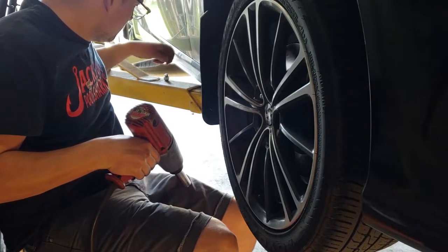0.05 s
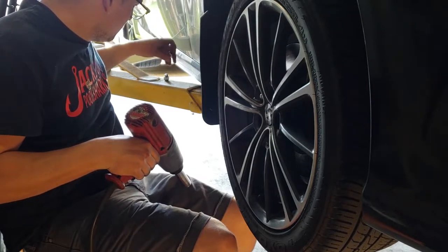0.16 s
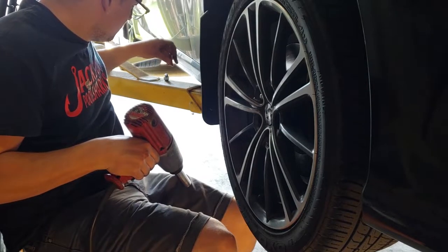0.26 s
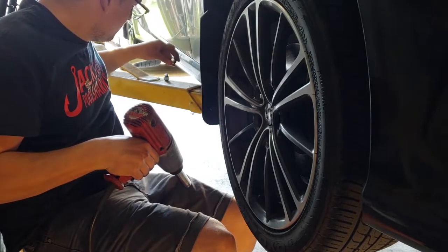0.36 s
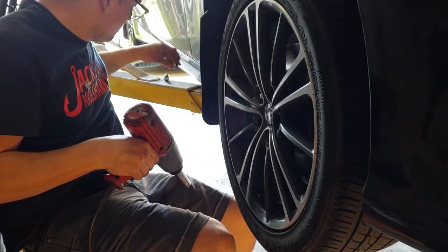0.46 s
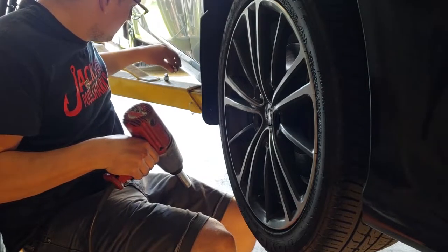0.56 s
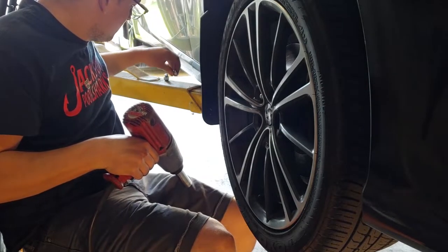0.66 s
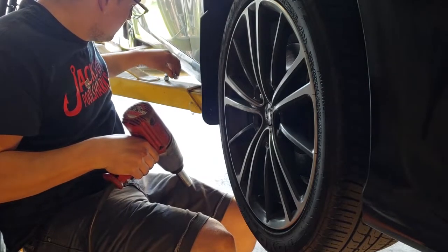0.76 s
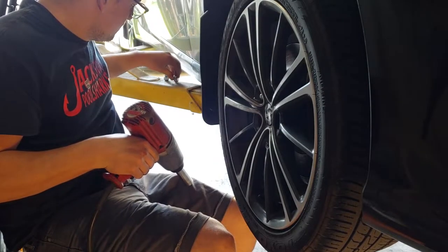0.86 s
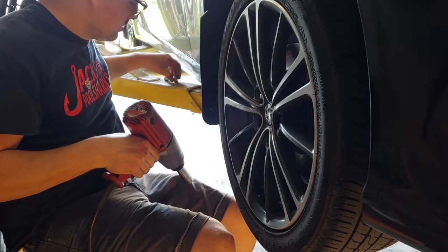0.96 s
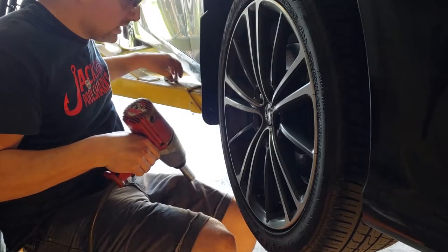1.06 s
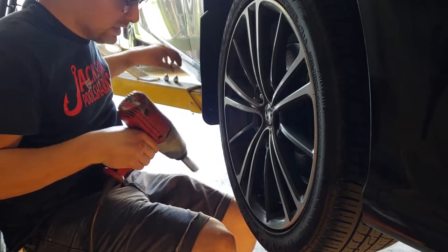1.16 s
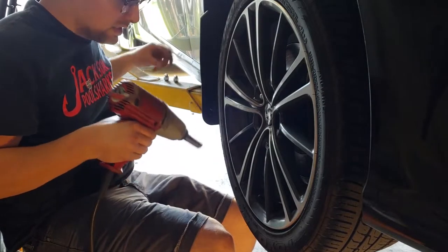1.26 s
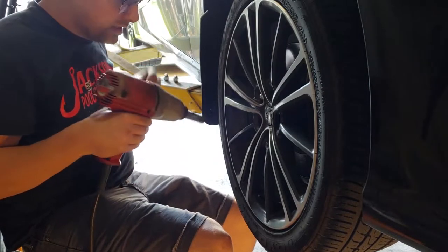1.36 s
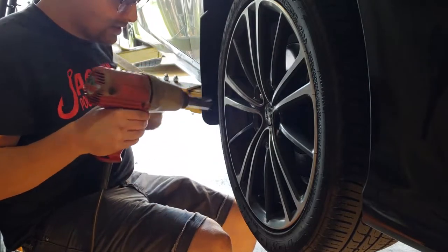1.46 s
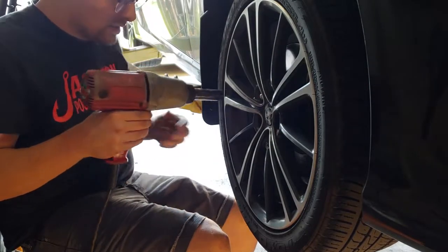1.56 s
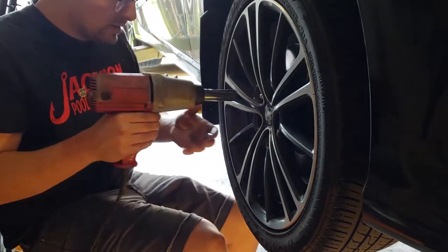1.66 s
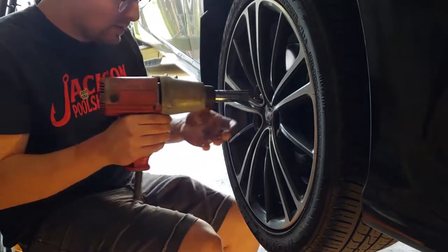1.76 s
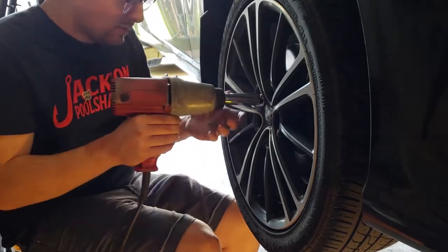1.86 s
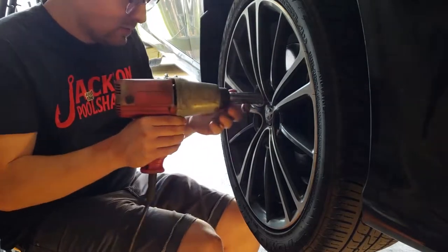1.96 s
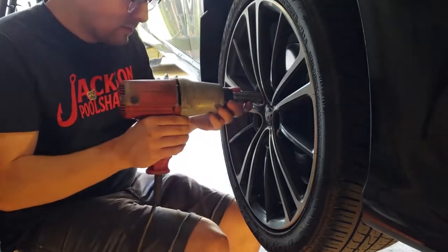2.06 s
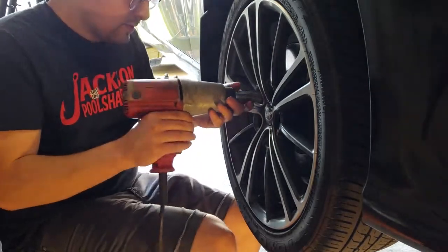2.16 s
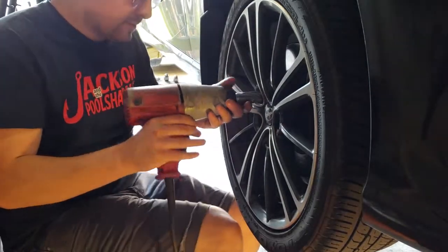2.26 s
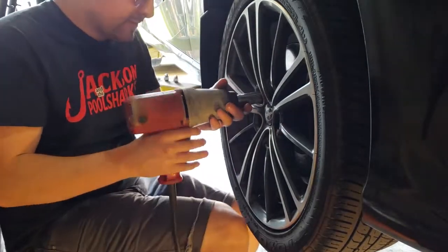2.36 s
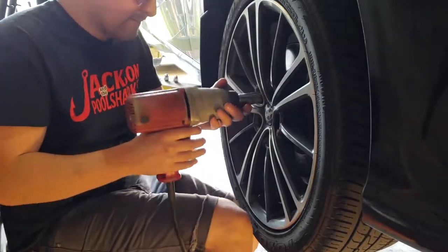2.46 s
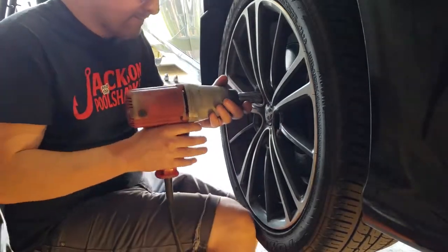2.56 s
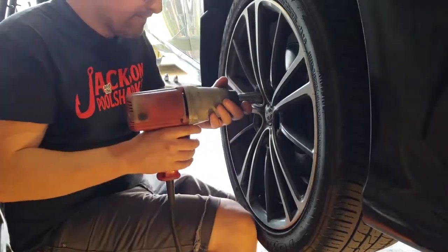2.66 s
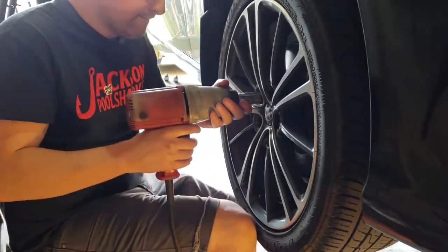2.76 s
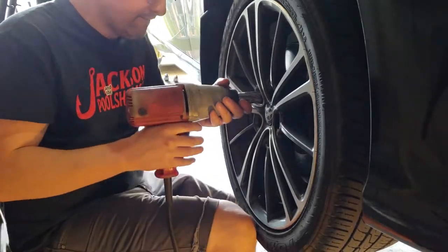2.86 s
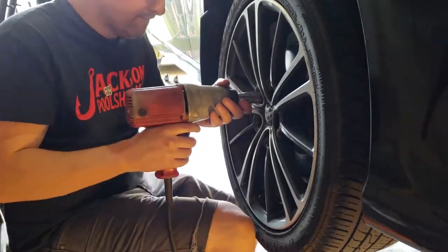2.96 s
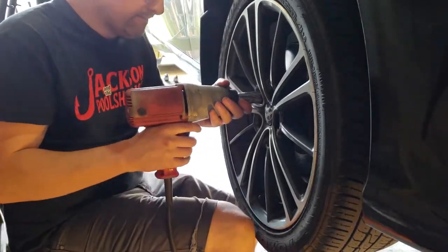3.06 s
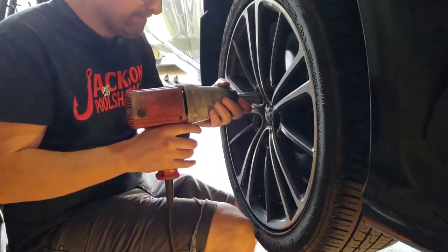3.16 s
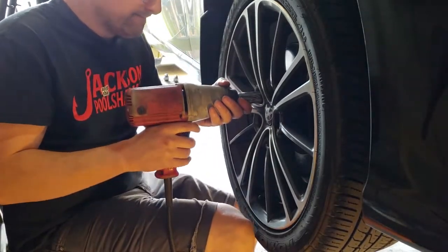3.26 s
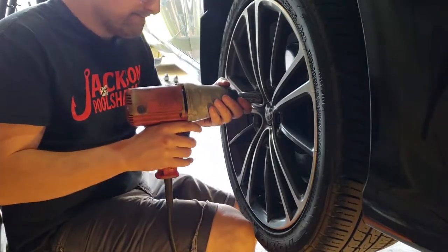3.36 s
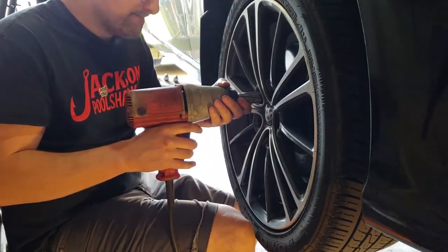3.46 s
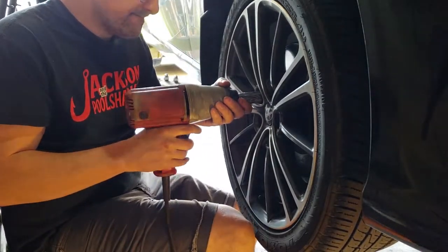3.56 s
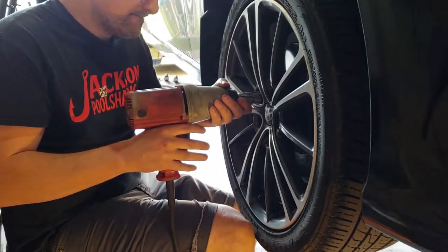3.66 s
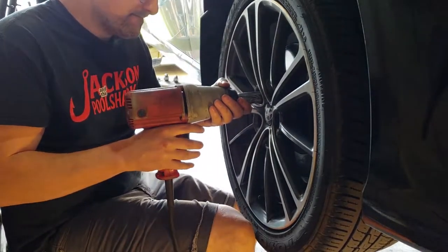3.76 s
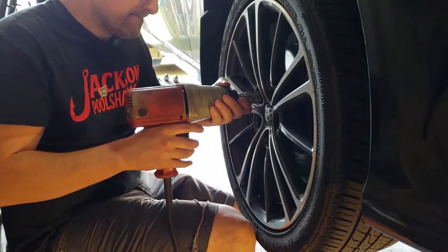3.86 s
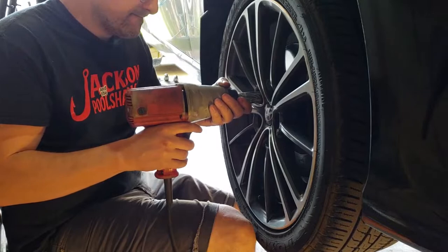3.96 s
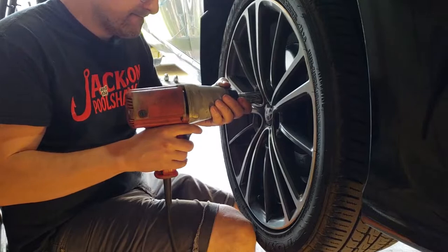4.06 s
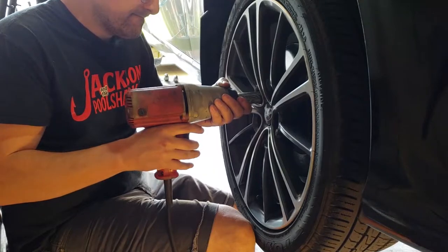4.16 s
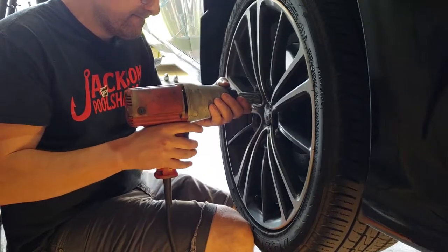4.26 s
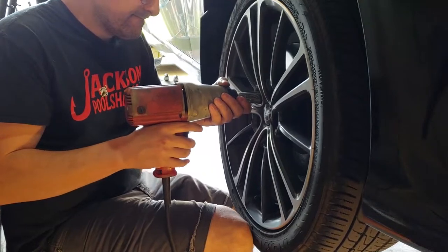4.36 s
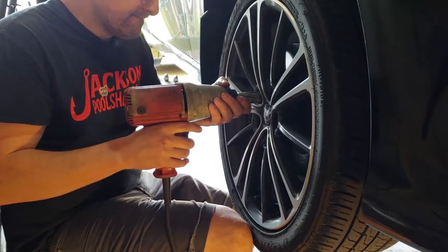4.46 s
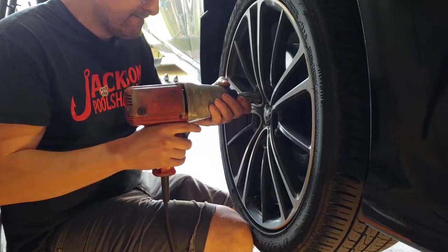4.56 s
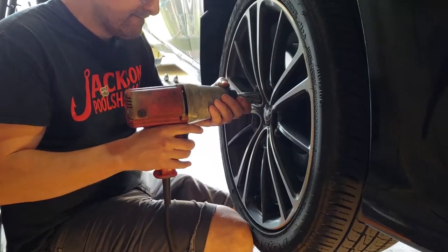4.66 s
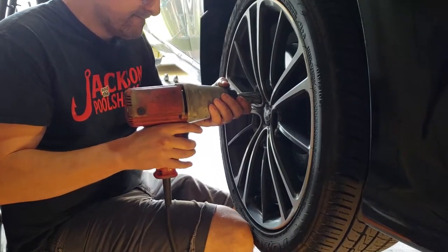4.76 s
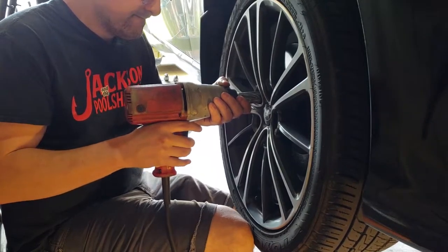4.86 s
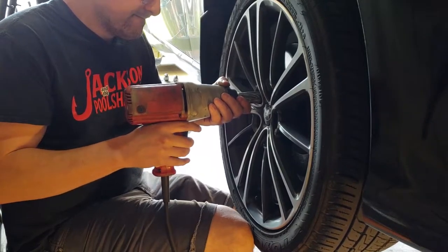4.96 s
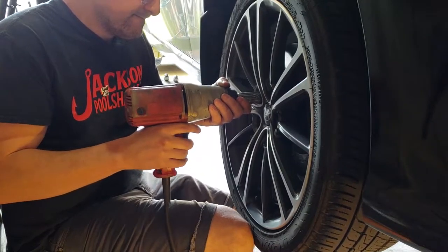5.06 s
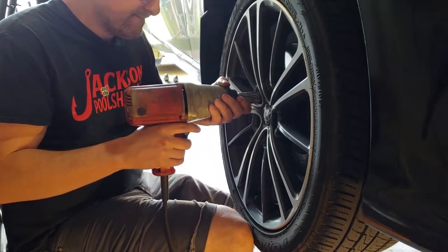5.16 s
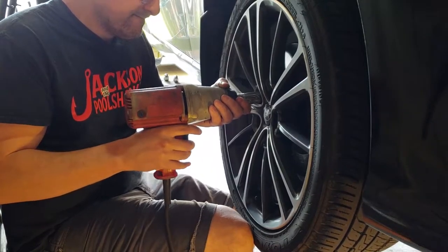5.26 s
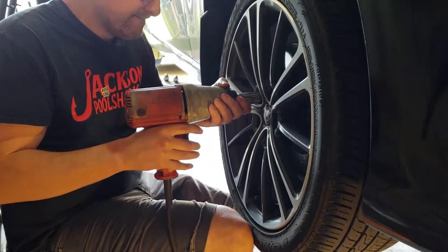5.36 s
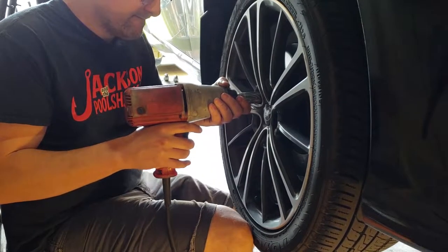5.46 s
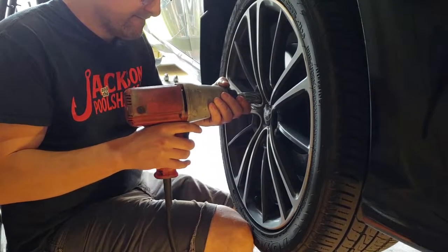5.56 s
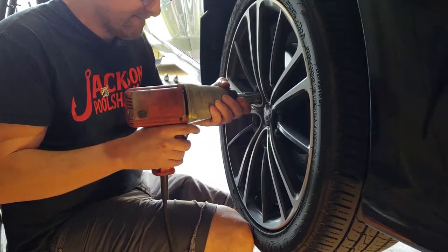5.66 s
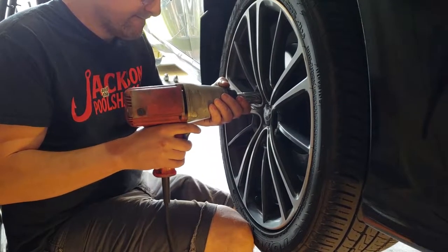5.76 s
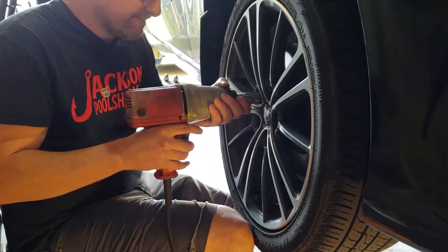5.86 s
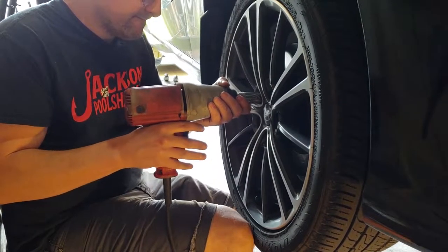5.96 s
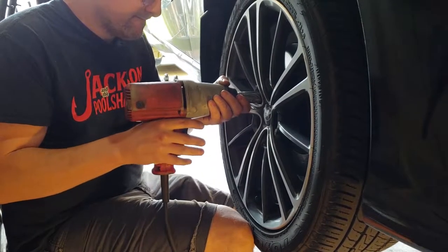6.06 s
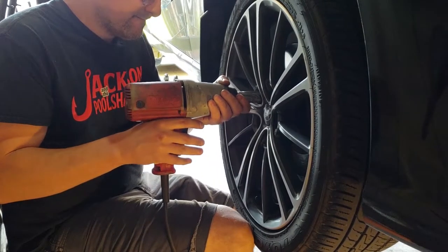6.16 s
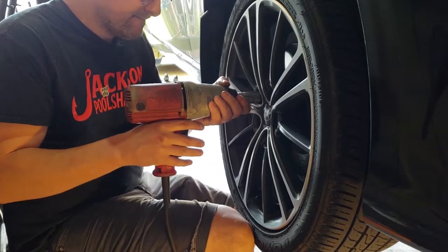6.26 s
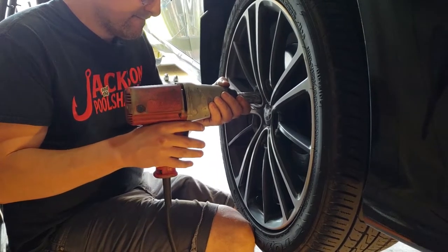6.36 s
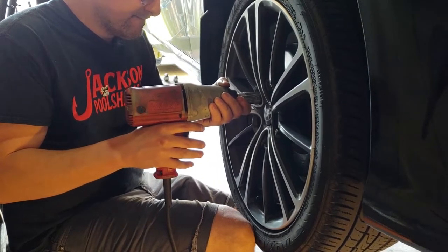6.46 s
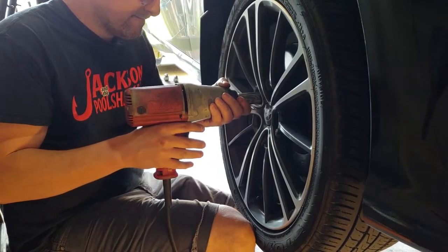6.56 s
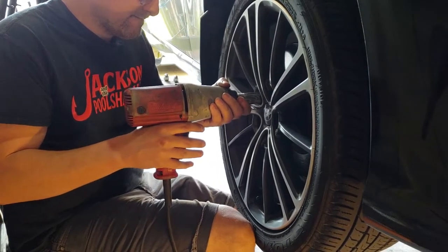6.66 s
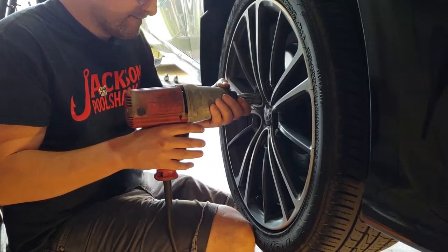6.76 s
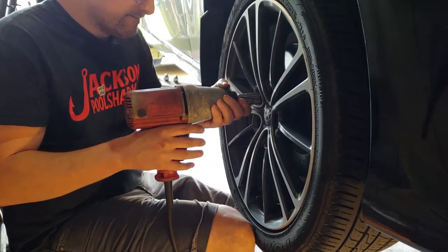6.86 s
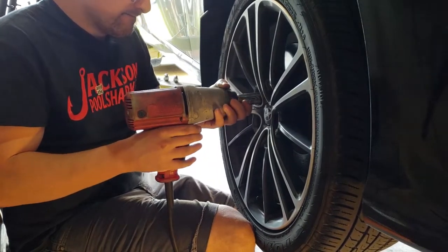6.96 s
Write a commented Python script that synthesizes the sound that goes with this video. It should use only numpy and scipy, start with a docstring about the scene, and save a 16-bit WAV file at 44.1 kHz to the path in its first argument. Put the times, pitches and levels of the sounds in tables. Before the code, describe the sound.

Quiet garage air, a small metal clink and socket knocks, then harsh rapid-fire impact wrench bursts on a wheel nut, ending in a whirring run-down.

```python
"""A corded electric impact gun loosens a wheel nut in an open garage, close to a phone's two microphones.
The socket is knocked and scraped onto the nut; then five trigger pulls bring runs of cracking hammer blows.
Nut squawks, wheel thuds and socket chatter join the blows, and the whining geared motor at last coasts down.
Noise bursts, ringing modes and gliding tones make the work, and quick reflections and a tail place it in the
garage. Behind are a tool's clink, clothes, handling rumble, a far bird, workshop air, hum, drone and hiss."""
import sys
import numpy as np
from scipy import signal
from scipy.fft import rfft, irfft
from scipy.io import wavfile
from scipy.ndimage import uniform_filter1d

SR = 44100
rng = np.random.default_rng(int(sys.argv[2]) if len(sys.argv) > 2 else 0)


def materialize(psi):
    """Save the field psi as 16-bit PCM at rate SR to the path in sys.argv[1].

    A 1-D psi becomes a single channel; in a 2-D psi each row is a channel.
    """
    bounded = np.clip(np.atleast_2d(psi).T, -1, 1)
    quanta = np.round(bounded * 32767).astype(np.int16)
    wavfile.write(sys.argv[1], SR, quanta)


N = 309582
TIME = np.arange(N) / SR  # s

# Runs of hammer blows: (first [s], last [s], number of blows, gap at full speed [s], first blow [dB],
# rebound relative to its blow [dB], squawk [dB])
BLOW_RUNS = [(3.676, 3.974, 8, 0.034, 2, -5.5, -21.5), (4.192, 4.497, 9, 0.029, -0.5, -11, -23.5),
             (4.726, 5.089, 10, .0328, -2.5, -11, -28.5), (5.3086, 5.706, 11, .0303, -3.7, -18, -25.5)]
# Lone blows as the hammer takes up slack or catches on the freed nut: (time [s], level [dB], squawk [dB])
LONE_BLOWS = [(3.662, -7.5, -23.5), (5.285, -20, -20.5), (5.8435, -9.5, -22.5), (5.9184, -3, -23.5),
              (5.9472, -7, -25.5), (6.059, -3.5, -34), (6.3951, -23, -43)]
# Trigger pulls, the nut braking the motor until it is free: (on [s], off [s], run-down [s], chatter [dB])
TRIGGER_PULLS = [(3.654, 3.92, 0.14, -17), (4.125, 4.446, 0.11, -23.5), (4.694, 5.034, 0.14, -25.5),
                 (5.245, 5.639, .15, -25.5), (5.797, 6.065, 0.97, -26)]
# Steel of socket and nut, spectrum: (frequency [Hz], density [dB per Hz])
STEEL_SPECTRUM = [(60, -44), (150, -22.5), (400, -11.5), (620, -14.5), (900, -1.5), (1250, -6), (1600, -8),
                  (2500, 0.5), (3600, 0), (4800, 1), (6000, -4), (7500, -4), (9300, -8.5), (12500, -4.5)]
# Socket resonances: (frequency [Hz], width [Hz], lift [dB])
SOCKET_RESONANCES = [(1590, 97, 9.5), (2880, 175, -12.5), (3007, 61, 5.5), (4100, 96, 5.5)]
# Where the colour of a crack changes from blow to blow: (frequency [Hz])
GRIP_POINTS = [700, 1400, 2400, 3400, 5000, 8000, 13000]
# Wheel thud, spectrum: (frequency [Hz], density [dB per Hz])
THUD_SPECTRUM = [(40, -51), (110, 1), (200, 0.5), (340, 7), (480, 6), (700, -15), (2000, -41)]
# Gear whine: (multiple of the mesh rate, level [dB])
WHINE_LINES = [(1, 0), (1.5, -8), (2, 1), (2.5, -8), (3, 1), (4, -1), (5, -5), (7, -7)]
# Motor case, spectrum: (frequency [Hz], density [dB per Hz])
CASE_SPECTRUM = [(60, -35), (250, -18), (430, -10.5), (650, -18), (900, -0.5), (1200, -7), (1800, -7),
                 (2400, -10), (3300, -4), (5000, -8), (7500, -15), (9000, -13.5)]
# Motor case resonances: (frequency [Hz], width [Hz], lift [dB])
CASE_RESONANCES = [(2250, 290, 9.1), (4200, 320, 6.4), (7160, 910, 15.2), (12000, 290, 3.8)]
# A dry bearing in the freewheeling motor: (time [s], level [dB])
BEARING_SQUEAL = [(6.1, -72), (6.22, -37), (6.3, -31), (6.41, -38.5), (6.55, -46), (6.9, -63)]
# The socket knocks on nut and rim: (time [s], level [dB], centre of its colour [Hz], spread [octaves],
# wheel thud [dB])
SOCKET_KNOCKS = [(2.061, -21, 1260, 0.55, -44), (2.072, -25, 2100, 1.9, -44),
                 (2.233, -31.5, 2370, 0.71, -52), (2.254, -22, 2520, 1.16, -46),
                 (2.304, -29, 4170, 0.63, -40), (2.462, -28, 6000, 2.4, -68),
                 (2.649, -22.5, 1530, 2.26, -31), (2.82, -47, 734, 0.25, -55), (3.09, -47, 1000, 1.2, -61),
                 (3.334, -46.5, 770, 0.42, -64), (3.361, -42, 4300, 1.1, -63)]
# Ringing of the wheel rim: (frequency [Hz], level [dB], t60 [s])
RIM_RINGS = [(542, -25, 0.51), (1044, -0.5, 0.073), (1113, 4.5, 0.065), (1172, -2.5, 0.066),
             (12000, -12, 0.17)]
# Ringing of the clinking tool: (frequency [Hz], level [dB], t60 [s])
TOOL_RINGS = [(2096, 16, 0.093), (2500, 0, 0.16), (2993, 2.5, 0.26), (4700, -11, 0.46), (5740, -19, 0.34),
              (7300, -16, 0.5)]
# The mechanic shifts and his clothes rustle: (middle [s], half length [s], level [dB])
CLOTH_MOVES = [(1.482, .18, -63.5), (1.973, 0.17, -60), (2.4, 0.22, -56), (2.754, 0.23, -59.5),
               (3.334, 0.2, -66)]
# Cloth, spectrum: (frequency [Hz], density [dB per Hz])
CLOTH_SPECTRUM = [(200, -49), (700, 2.5), (1500, -3.5), (4000, 1), (8000, 2), (15000, -2.5)]
# Rumble of the gun being shifted: (time [s], level [dB])
HANDLING_RUMBLE = [(1.5, -60), (1.95, -54), (2.3, -51.5), (2.9, -50.5), (3.6, -59), (4.2, -65)]
# Far bird calls: (time [s], level [dB])
BIRD_CALLS = [(0.036, -62), (0.639, -65.5), (1.269, -60), (3.17, -60)]
# Workshop air, spectrum: (frequency [Hz], density [dB per Hz])
AIR_SPECTRUM = [(15, -55), (25, -11), (107, 3), (297, -56), (368, -42.5), (582, -53), (722, -17.5),
                (826, -14.5), (1140, -13), (2850, -24.5), (15500, -44)]
# Faint hiss, spectrum: (frequency [Hz], density [dB per Hz])
HISS_SPECTRUM = [(300, -18), (2500, 1), (6000, -4), (7500, 7), (9000, -10), (13000, 5), (16000, -13)]

STALL_POWER, STALL_DB = 5, -4.5  # how late in a run the hammer slows, and how much weaker its last blow is
REBOUND_S = 0.015  # the hammer falls back on the anvil
LAST_REBOUND_S, LAST_REBOUND_DB = 0.023, -1  # after the last blow of a run, relative to it
END_SQUAWK_DB = 4  # added to the first and last squawk of a run
SCATTER_DB = 0.97  # from blow to blow
BUMP_S = 5.309  # the gun kicks against the wheel
COAST_POWER = 1.15  # drag brakes the motor hardest at speed
SCRAPE_S, SCRAPE_RISE_S, SCRAPE_FALL_S, SCRAPE_DB = 2.266, 0.065, 0.017, -47
CLINK_S = 1.043
AIR_DB = -65.5
TOP_HZ = 15850  # upper edge of the phone's sound


def undb(db):
    """Decibels to gain."""
    return 10 ** (np.asarray(db) / 20)


def unit(x):
    """Scale to rms 1."""
    return x / np.sqrt(np.mean(x ** 2) + 1e-18)


def curve(rows, axis=1):
    """One column of a table, joined by straight lines in time."""
    rows = np.array(rows)
    return np.interp(TIME, rows[:, 0], rows[:, axis])


def noise(size=N):
    """White noise."""
    return rng.standard_normal(size)


def walk(rate):
    """Slow chance with rms 1, drawn anew at about this rate in Hz and smoothed."""
    hold = max(int(SR / rate), 1)
    steps = np.repeat(noise(N // hold + 1), hold)
    return unit(uniform_filter1d(steps, hold)[:N])


def tone(hz):
    """Sine that follows a moving frequency."""
    return np.sin(2 * np.pi * np.cumsum(hz) / SR)


def fade(t60, size=SR // 2):
    """Exponential decay from 1 that falls 60 dB in t60 seconds."""
    return undb(-60 * TIME[:size] / t60)


def add(track, s, sound):
    """Mix a sound into a track at time s."""
    start = int(s * SR)
    track[start:start + len(sound)] += sound[:N - start]


def colour(x, points, modes=(), size=4096):
    """Causal filter of unit power: a smooth spectrum lifted or cut by resonances."""
    f = np.arange(size // 2 + 1) * SR / size + 1  # 1 Hz up, to keep the logarithm finite
    hz, db = np.transpose(points)
    gain = undb(np.interp(np.log(f), np.log(hz), db))
    for centre, width, lift in modes:
        gain = gain * (1 + (undb(lift) - 1) / np.hypot(1, 2 * (f - centre) / width) ** 2)
    # folding the cepstrum gives minimum phase, so the response starts at once
    cepstrum = irfft(np.log(gain + 1e-9))[:size // 2]
    cepstrum[0] = 0
    response = irfft(np.exp(rfft(2 * cepstrum, size)))
    return signal.fftconvolve(x, response / np.linalg.norm(response))[:len(x)]


def ring(modes):
    """Struck modes decay as sines, each with a slightly different strength every time."""
    out = 0
    for hz, db, t60 in modes:
        strength = undb(db + noise(size=1))
        out = out + strength * fade(t60) * np.sin(2 * np.pi * hz * TIME[:SR // 2])
    return out


def burst(t60):
    """A contact: a dense crack that dies away."""
    return noise(SR // 2) * fade(t60)


def rattle(rate, spread_db, t60):
    """Random small contacts of uneven strength, rate per second, rms 1."""
    hits = rng.random(N) < rate / SR
    power = hits * undb(spread_db * np.clip(noise(), -2, 2)) ** 2
    envelope = np.sqrt(np.abs(signal.fftconvolve(power, fade(t60) ** 2)[:N]))
    return unit(noise() * envelope)


def strokes():
    """Rows (time [s], blow [dB], squawk [dB]): gaps stretch and blows weaken as the motor stalls; each rebounds."""
    rows = list(LONE_BLOWS)
    for first, last, number, gap, db, rebound_db, squawk_db in BLOW_RUNS:
        progress = np.linspace(0, 1, int(round(number)))
        even = first + gap * np.arange(len(progress))
        times = even + (last - even[-1]) * progress ** STALL_POWER
        blows = db + STALL_DB * progress + SCATTER_DB * noise(len(progress))
        ends = (2 * progress - 1) ** 2  # 1 at both ends of the run, 0 in its middle
        squawks = squawk_db + END_SQUAWK_DB * ends + SCATTER_DB * noise(len(progress))
        run = np.c_[times, blows, squawks]
        rows += [*run]
        rows += [*(run[:-1] + [REBOUND_S, rebound_db, rebound_db])]
        rows += [run[-1] + [LAST_REBOUND_S, LAST_REBOUND_DB, LAST_REBOUND_DB]]
    return rows


def hammer(blows, crack_db=-8, ring_db=-22.0, grip_db=2.8):
    """Blows crack as noise through anvil and socket, each coloured by its grip, and set the socket ringing."""
    cracks, rings = np.zeros((2, N))
    for s, db, _ in blows:
        grip = noise(size=2)  # the socket sits differently on the nut every time
        tint = np.c_[GRIP_POINTS, grip_db * noise(len(GRIP_POINTS))]
        crack = colour(burst(0.028)[:SR // 20], tint, size=256)
        add(cracks, s, undb(db + crack_db) * crack)
        socket = ring([(4190 + 50 * grip[1], 0, 0.06)])
        add(rings, s, undb(db + ring_db + 4 * grip[0]) * socket)
    return colour(cracks, STEEL_SPECTRUM, SOCKET_RESONANCES) + rings


def thread(blows, start_hz=1040, end_hz=760, glide_s=0.0085, squawk_db=-1):
    """At each blow the nut slips in its dry thread: a short rough squawk that falls as the nut slows."""
    out, t = np.zeros(N), TIME[:SR // 50]
    swell = np.sin(np.pi * np.sqrt(t / t[-1]))
    for s, _, db in blows:
        glide = end_hz + (start_hz - end_hz) * np.exp(-t / glide_s)
        hz = glide * (1 + 0.02 * noise(size=1))
        tight = np.interp(s, [3.9, 4.8], [1.14, 1])  # the tight nut sings higher
        jitter = 1 + 0.035 * unit(uniform_filter1d(noise(len(t)), size=40))
        add(out, s, undb(db + squawk_db) * swell * tone(hz * tight * jitter))
    return out


def wheel(blows, thud_db=-37, thud_t60=0.056, tight_db=8.0, bump_db=-22, bump_hz=62):
    """The wheel thuds under the blows, most while the nut is tight, and booms once as the gun kicks."""
    thuds, boom = np.zeros((2, N))
    for s, db, _ in blows:
        tight = np.interp(s, [4, 4.3], [tight_db, 0])
        add(thuds, s, undb(db + thud_db + tight) * burst(thud_t60))
    add(boom, BUMP_S, undb(bump_db) * fade(0.017) * np.sin(2 * np.pi * bump_hz * TIME[:SR // 2]))
    return colour(thuds, THUD_SPECTRUM) + boom


def chatter(blows, attack_s=0.03, rise_db=26, sag_db=4, release_db_per_s=290, shake_db=-17, shake_t60=0.084):
    """The socket rattles on the flats of the nut while the trigger is held; every blow shakes it further."""
    power = np.zeros(N)
    for on, off, _, db in TRIGGER_PULLS:
        held = np.interp(TIME, [on, on + attack_s, off], [db - rise_db, db, db - sag_db])
        release = release_db_per_s * np.maximum(TIME - off, 0)
        power += (TIME > on) * undb(held - release) ** 2
    for s, db, _ in blows:
        add(power, s, (undb(db + shake_db) * fade(shake_t60)) ** 2)
    contacts = rattle(rate=900, spread_db=6.0, t60=0.0057)
    return np.sqrt(power) * colour(contacts, STEEL_SPECTRUM, SOCKET_RESONANCES)


def motor(top_hz=1510, spin_up_s=0.043, full_hz=330, motor_db=-34.0):
    """Gear whine and brush rattle follow the motor's speed, throbbing with each turn; a bearing squeals late."""
    mesh_hz = np.zeros(N)
    for on, off, run_down, _ in TRIGGER_PULLS:
        spin_up = 1 - np.exp(-np.maximum(TIME - on, 0) / spin_up_s)
        coast = np.clip(1 - (TIME - off) / run_down, 0, 1) ** COAST_POWER
        mesh_hz = np.maximum(mesh_hz, top_hz * spin_up * coast)
    phase = 2 * np.pi * np.cumsum(mesh_hz * (1 + 0.03 * walk(300))) / SR
    # backlash makes the teeth meet unevenly, so the whine is rough and broken
    whine = sum(undb(db + 3 * walk(60)) * np.sin(k * phase) for k, db in WHINE_LINES)
    whine_spectrum = [(100, -50), (650, -18), (950, 0), (1250, -1), (1700, -7), (2500, -5), (5000, -12)]
    whine = unit(colour(whine, whine_spectrum))
    brushes = colour(rattle(rate=910, spread_db=4.5, t60=0.013), CASE_SPECTRUM, CASE_RESONANCES)
    throb = 1 + 0.25 * np.sin(phase / 36)  # once a turn of the hammer
    running = throb * (brushes + undb(-10.5) * whine)
    squeal_level = (mesh_hz > 0) * undb(curve(BEARING_SQUEAL) + 3 * walk(40))
    squeal_throb = 1 + 0.7 * np.sin(phase / 50)
    squeal = squeal_level * squeal_throb * tone(12090 + 170 * walk(900))
    return undb(motor_db) * np.tanh(mesh_hz / full_hz) * running + squeal


def seating(knock_t60=0.044, rim_db=-15, thud_t60=0.1):
    """The socket feels its way onto the nut: noise knocks ring the rim in proportion and thud in the wheel."""
    out, octaves = np.zeros(N), np.linspace(np.log2(100), np.log2(16000), num=24)
    for s, db, hz, spread, thud_db in SOCKET_KNOCKS:
        distance = octaves - np.log2(hz)
        above = np.maximum(distance, 0)  # the contact time rounds off the treble
        shape = -20 * np.log10(1 + (distance / spread) ** 2) - 2.0 * above ** 2
        knock = colour(burst(knock_t60), np.c_[2 ** octaves, shape])
        add(out, s, undb(db) * (knock + undb(rim_db) * ring(RIM_RINGS)))
        add(out, s, undb(thud_db) * colour(burst(thud_t60), THUD_SPECTRUM))
    return out


def scrape():
    """Steel drags on steel in a grainy swell that breaks off as the socket drops on."""
    swell = np.exp(-np.maximum((SCRAPE_S - TIME) / SCRAPE_RISE_S, (TIME - SCRAPE_S) / SCRAPE_FALL_S))
    grains = rattle(rate=380, spread_db=3, t60=0.012)
    spectrum = [(500, -16), (1200, -8), (1800, -3), (3200, 0), (5000, -14), (9000, -26)]
    return undb(SCRAPE_DB) * swell * colour(grains, spectrum)


def mechanic(clink_db=-53, tick_db=-45, tick_t60=0.37):
    """A steel tool clinks on the lift arm, clothes rustle, the heavy gun rumbles in the hands."""
    motion = sum(undb(db) * np.exp(-((TIME - s) / half) ** 2) for s, half, db in CLOTH_MOVES)
    cloth = colour(rattle(rate=2500, spread_db=3, t60=0.003), CLOTH_SPECTRUM)
    out = motion * undb(0.46 * walk(25.4)) * cloth
    add(out, CLINK_S, undb(clink_db) * ring(TOOL_RINGS))
    tick_spectrum = [(1500, -8.5), (2400, 2.5), (3600, 1.0), (6500, -13), (9000, -35)]
    add(out, CLINK_S, undb(tick_db) * colour(burst(tick_t60), tick_spectrum))
    rumble_spectrum = [(35, -2), (100, 2.0), (200, -18.5), (600, -26.5), (3000, -70)]
    rumble = colour(undb(curve(HANDLING_RUMBLE)) * noise(), rumble_spectrum)
    return out + rumble


def bird(start_hz=5000, end_hz=3000):
    """Falling, warbled tones from outside, smeared by the yard differently at each microphone."""
    out, t = np.zeros(N), TIME[:SR // 7]
    warble = 700 * np.sin(2 * np.pi * 38 * t)
    hz = start_hz + (end_hz - start_hz) * t / t[-1] + warble
    for s, db in BIRD_CALLS:
        add(out, s, undb(db) * np.sin(np.pi * t / t[-1]) ** 0.5 * tone(hz))
    yards = [burst(0.5) for _ in range(2)]
    return np.array([signal.fftconvolve(out, yard / np.linalg.norm(yard))[:N] for yard in yards])


def diffuse(size, spacing=0.17):
    """Noise from all sides at two microphones (spacing in m): alike in the bass, unrelated in the treble."""
    alike = 0.9 * np.sinc(2 * np.fft.rfftfreq(size, 1 / SR) * spacing / 343)  # 343 m/s, speed of sound
    mid = irfft(rfft(noise(size)) * np.sqrt((1 + alike) / 2), size)
    side = irfft(rfft(noise(size)) * np.sqrt((1 - alike) / 2), size)
    return np.array([mid + side, mid - side])


def background(hum_hz=92.6, late_db=-12, hiss_db=-78, drone_hz=73, drone_db=-67):
    """Low workshop air and a wavering hum ease off towards the end; a steady drone and a faint hiss stay."""
    air = np.array([colour(side, AIR_SPECTRUM) for side in diffuse(N)])
    air = air * undb(AIR_DB + 0.5 * walk(2.8))
    hum = undb(-65 + 3 * walk(6)) * tone(hum_hz + 2 * walk(8))
    drone = undb(drone_db) * np.sin(2 * np.pi * drone_hz * TIME)
    hiss = undb(hiss_db) * np.array([colour(side, HISS_SPECTRUM) for side in diffuse(N)])
    easing = undb(np.interp(TIME, [3.6, 6], [0, late_db]))
    return (air + hum) * easing + drone + hiss


def garage(x, lag_ms=0.04, direct_db=-5, near_db=-3, near_t60=0.036, hall_db=-8, low_t60=0.42, high_t60=0.17,
           size=SR):
    """Direct sound, quick reflections from car and floor, and a tail whose treble dies first."""
    near, tail = diffuse(size) * fade(near_t60, size), diffuse(size)
    lows = signal.sosfilt(signal.butter(1, 3500, fs=SR, output="sos"), tail)
    hall = lows * fade(low_t60, size) + 0.71 * (tail - lows) * fade(high_t60, size)
    hall = hall * (1 - fade(0.021, size))  # the tail builds up after the direct sound
    response = undb(near_db) * near / np.linalg.norm(near[0])
    response = response + undb(hall_db) * hall / np.linalg.norm(hall[0])
    response[0, 0] += undb(direct_db)
    response[1, int(lag_ms * SR / 1000)] += undb(direct_db)  # later at the right microphone
    return signal.fftconvolve(x[None], response, axes=1)[:, :N]


def scene(left_db=0.27):
    """Each part of the work reaches the two microphones by its own paths; the left one is nearer."""
    blows = strokes()
    # two independent chatters, one arriving with the blows and one with the shorter lag
    steel = garage(hammer(blows), lag_ms=0.45) + garage(chatter(blows), lag_ms=0.45) + garage(chatter(blows))
    nut = garage(thread(blows) + wheel(blows), direct_db=-1.5, near_db=-2.5, hall_db=-11)
    work = steel + nut + garage(motor()) + garage(seating() + scrape()) + garage(mechanic())
    return work * undb([[left_db], [-left_db]]) + bird() + background()


def record(dry):
    """The phone clips at full scale and cuts the top."""
    steep = signal.firwin(401, TOP_HZ, fs=SR)
    return signal.fftconvolve(np.clip(dry, -1, 1), steep[None], mode="same", axes=1)


dry = scene()
out = record(dry)
materialize(out)
```